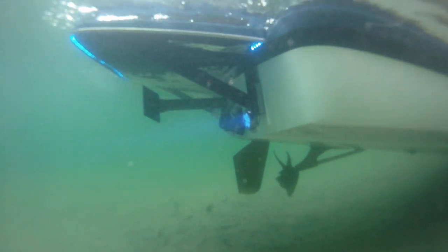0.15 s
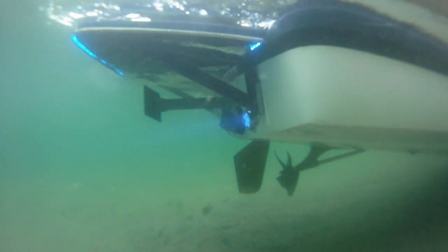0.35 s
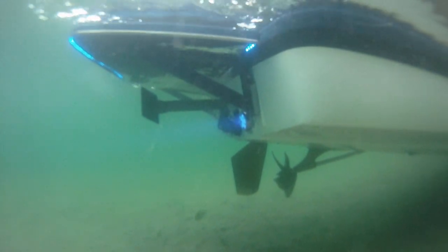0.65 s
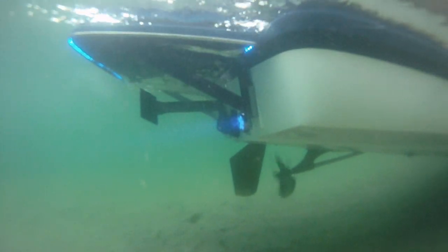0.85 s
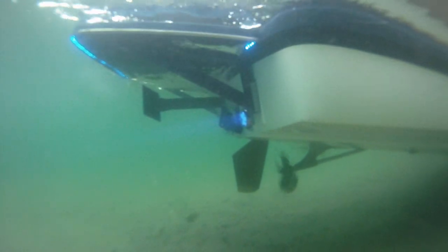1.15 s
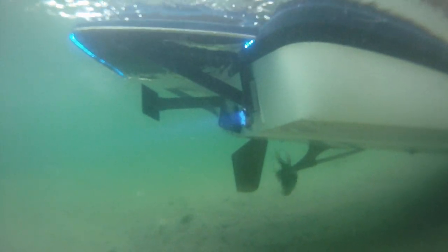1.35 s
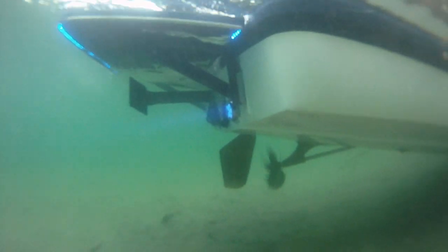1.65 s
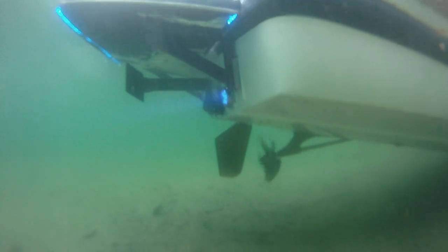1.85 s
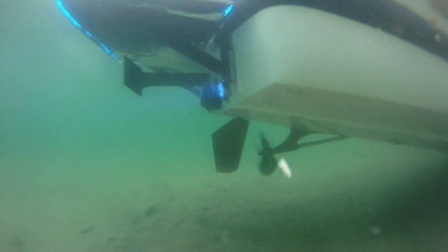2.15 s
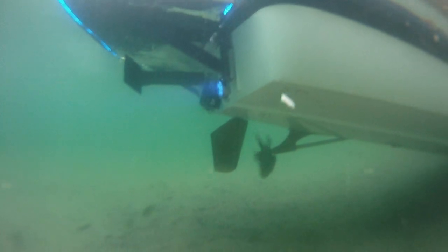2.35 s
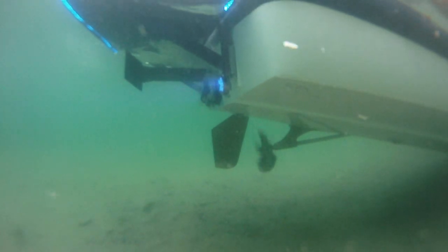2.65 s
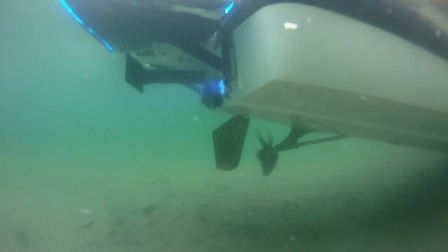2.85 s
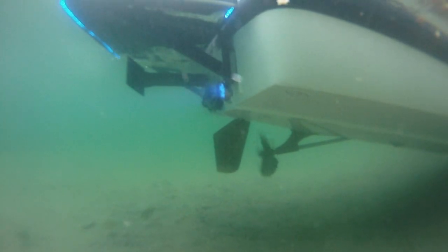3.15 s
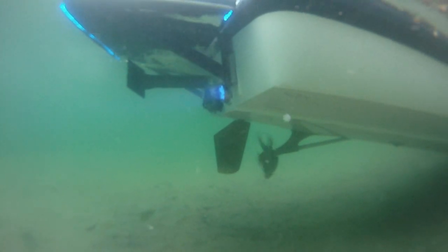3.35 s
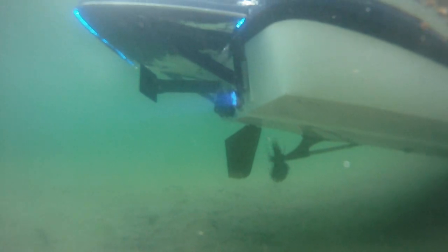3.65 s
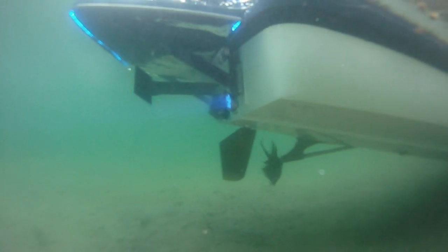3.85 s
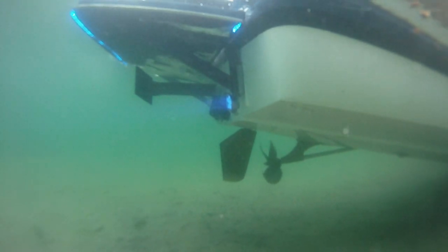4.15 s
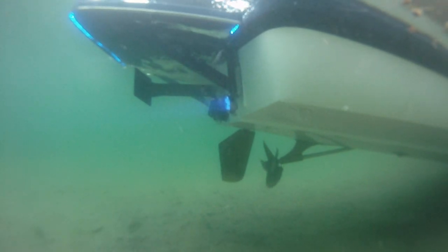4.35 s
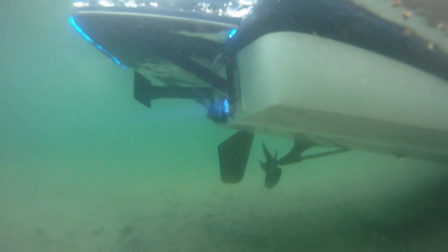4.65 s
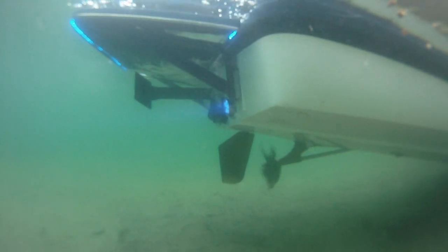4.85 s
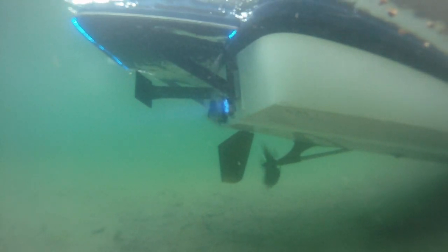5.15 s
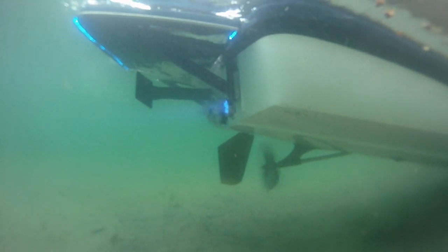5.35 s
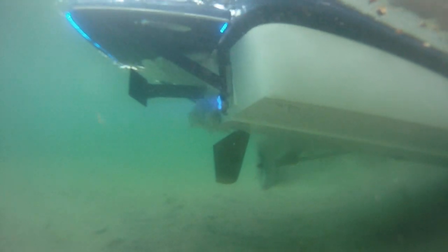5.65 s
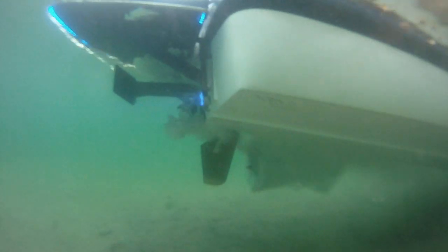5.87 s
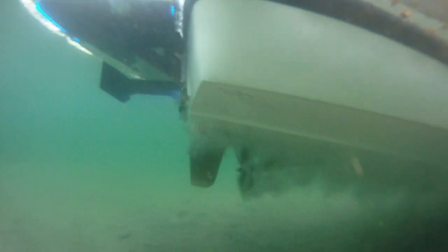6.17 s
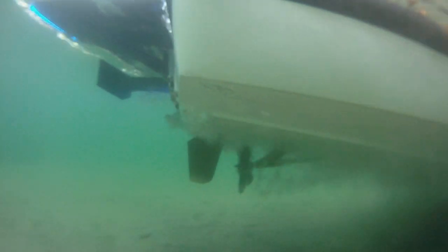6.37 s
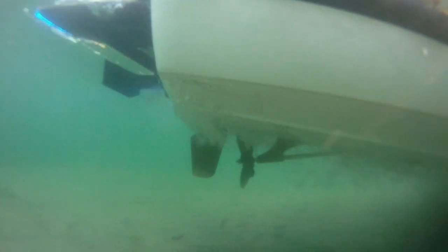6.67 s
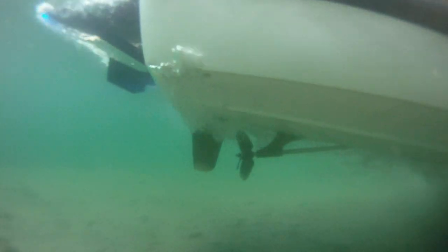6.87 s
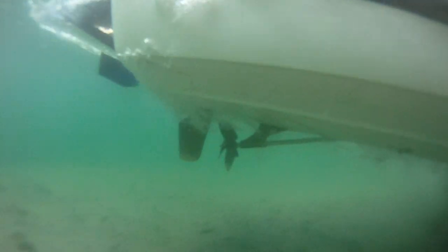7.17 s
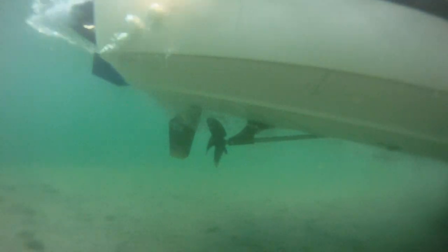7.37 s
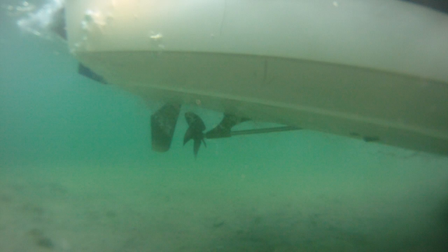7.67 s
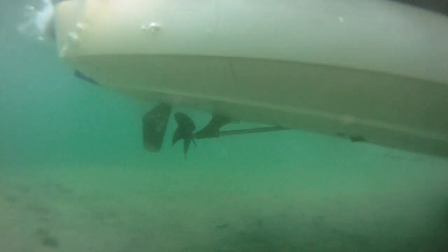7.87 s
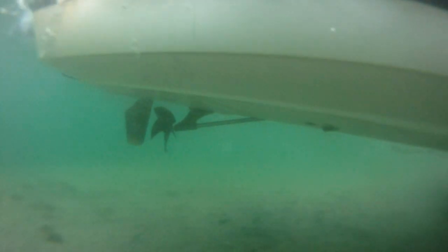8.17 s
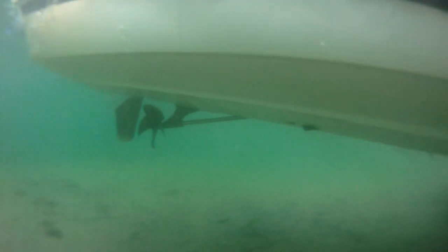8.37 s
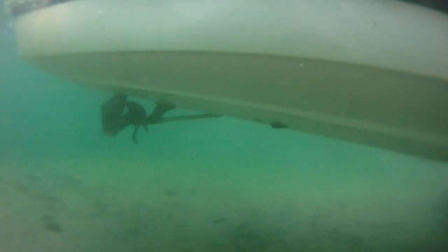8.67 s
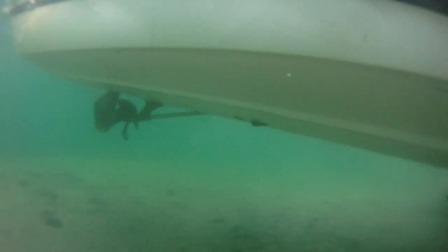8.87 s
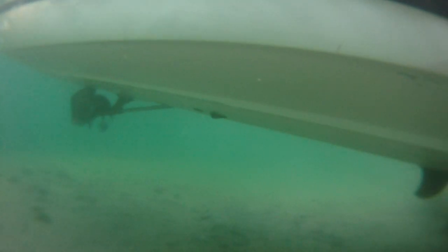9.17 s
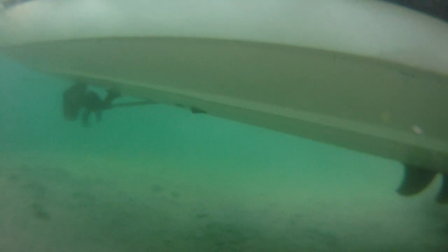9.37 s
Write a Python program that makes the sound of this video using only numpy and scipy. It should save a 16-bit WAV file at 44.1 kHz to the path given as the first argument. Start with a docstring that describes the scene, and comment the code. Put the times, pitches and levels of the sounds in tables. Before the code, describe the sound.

Heard underwater just behind an inboard boat: a soft idle throb and taps on the camera housing, then a rising clutch squeal snaps into a rough, fluttering gear whine for about three seconds. After a pause it engages again, the engine revs, and the propeller churns a burst of bubbles. The revs fall to a low coasting rumble with small plops, and a last short whine ends it. Narrow, glassy camera sound.

```python
"""Idling V8 ski boat, heard under water just astern.

The exhaust throbs as summed firing harmonics over gurgling noise. Three times the clutch squeals upward and
the gears whine and chatter, a mesh tone bent by shaft load. In the second engagement the throttle is blipped,
the propeller churns (coloured bubble impulses), then the boat coasts until the third. Taps ring the waterproof
housing of a cheap camera, whose slow sample-and-hold mirrors the sound into a glassy treble."""
import sys
import numpy as np
from scipy import signal
from scipy.fft import rfft, irfft
from scipy.io import wavfile
from scipy.ndimage import uniform_filter1d

SR = 44100
rng = np.random.default_rng(int(sys.argv[2]) if len(sys.argv) > 2 else 0)


def dump(signal):
    """Clip the signal to [-1, 1] and save it as 16-bit WAV at the path in sys.argv[1]."""
    limited = np.clip(np.atleast_2d(signal).T, -1, 1)
    pcm = np.round(limited * 32767).astype(np.int16)
    wavfile.write(sys.argv[1], SR, pcm)


N = 419832
T = np.arange(N) / SR

# exhaust lines at idle: order (multiple of the eight-firing cycle), level_db
IDLE_LINES = [(8, -2.5), (9, -30), (11, -0.5), (13, -4.5), (15, -12), (16, 1), (18, -13), (24, -13)]
# exhaust lines while coasting: order, level_db
COAST_LINES = [(8, 1), (11, -15), (13, -8.5), (16, -4.5), (24, -27), (48, -21)]
# housing resonances the rattling teeth ring: freq_hz, level_db
RATTLE_MODES = [(2080, -20), (3450, -31), (4550, -38), (5500, -39)]
# stray hard clacks of the gear teeth: time_s, level_db
TOOTH_CLACKS = [(1.0044, -10), (1.6234, -7), (5.3012, -10), (5.3236, -6.5)]
# sharp taps on the housing: time_s, peak_db, brightness_db_per_octave
HOUSING_TAPS = [(.606, -17, -5.5), (.826, -15.5, -1.5), (4.2745, -25.5, -1), (4.343, -7.5, -2.5),
                (4.885, -18, -1), (5.71, -11, -7), (7.56, -37, -1)]
# ringing modes of the housing: freq_hz, level_db, t60_s
HOUSING_MODES = [(353, -7.5, 0.11), (623.6, 4, 0.11), (1290, 4, 0.054), (1850, -10, 0.22), (2114, 2, 0.11),
                 (2210, 4, 0.032), (2763, -9, 0.15), (3310, -14, 0.14)]
# spectra of small, big and finest bubbles, and of exhaust gas: freq_hz, relative_level_db
RUSH_SPECTRUM = [(1200, -22), (1310, 0), (1430, -0.5), (1570, -20), (1770, -0.5), (1900, -3), (2060, 6),
                 (2350, -7.5), (2650, -11), (3100, -18), (3700, -35), (5500, -61)]
CHURN_SPECTRUM = [(130, 2), (185, -1), (240, -1.5), (320, -0.5), (420, 2), (540, 4.5), (625, 13),
                  (700, -3.5), (820, 2), (990, -15), (1120, -20), (1295, 1), (1430, -7.5), (1560, -23)]
FIZZ_SPECTRUM = [(2500, 2.5), (3200, 6), (3700, 1), (4200, -7.5), (4500, -1), (5100, -7.5), (5500, -1.5),
                 (5850, -7)]
GURGLE_SPECTRUM = [(23, -3), (46, -4.5), (81, 5.5), (116, -2), (162, -8.5)]
# throttle blip, then a small surge while coasting: time_s, firing_rate_above_idle_hz
REV_CURVE = [(5.15, 0), (5.3, 15), (5.45, 72.5), (5.7, 114), (5.86, 108), (6.08, 58), (6.3, 35), (6.7, 14),
             (7.25, 5), (8, 15), (8.75, 5), (9.2, 0.5)]
# exhaust swells as the throttle opens, thins at high revs, booms on the overrun: time_s, level_db
EXHAUST_CURVE = [(0, -32), (5.12, -30.5), (5.22, -24), (5.45, -41), (5.92, -37.5), (6.12, -23.5),
                 (6.28, -31), (7.4, -27.3), (9.52, -32)]
# gear put in: clutch_lock_s, let_out_s, whine_db, bite_db, grab_db, wash_db, slip_s
GEAR_ENGAGEMENTS = [(.872, 3.8, -16.5, -9.5, -32.5, -32, .25), (4.798, 5.84, -15.8, -9, -30.5, -36.5, .14),
                    (9.203, 9.44, -17.7, -14.5, -40, -36.3, .13)]
# cavitation as the propeller bites and at top revs, then spin-down: time_s, churn_db, rush_db, fizz_db
THRUST_CURVE = [(5.16, -44, -39, -55), (5.28, -35.5, -21.5, -40), (5.38, -25.5, -21.3, -38.5),
                (5.5, -25.5, -26, -48), (5.74, -27, -20, -37.5), (5.91, -31, -29.5, -51),
                (6.08, -30.5, -32, -52.5), (6.26, -40.5, -42, -63.5), (6.7, -54, -56, -81)]
# stirred water out of gear: churn_db, rush_db, fizz_db
IDLE_STIR_DB = (-43, -49.5, -64.5)
# in gear, relative to the engagement's wash_db: churn_db, rush_db, fizz_db
GEAR_STIR_DB = (-9.5, -.4, -9.2)
# relative to the engagement's grab_db: churn_db, rush_db, fizz_db
GRAB_STIR_DB = (1.5, 2, -14)
# in each engagement, when a blade pass meets a firing: time_s
BLADE_MEETS_FIRING_S = (2.670, 5.149, 9.338)

IDLE_HZ, BLADE_HZ = 42.2, 30.6  # firings and blade passes a second at idle
DIP_DB, DIP_AFTER_S, DIP_S = -12, 0.068, 0.037  # the rumble dips briefly after each take-up
SQUEAL_HZ, SQUEAL_RISE_HZ_PER_S = 372, 120  # slipping plates
LOCK_HZ, LOCK_S = 608, .019  # snap up to speed
SQUEAL_DB, SQUEAL_SWELL_DB_PER_S, BITE_S = -26, 63, 0.007
GRAB_BEFORE_S, GRAB_S = .018, .018  # rough burst just before the lock
WHINE_HZ, WHINE_SAG_HZ_PER_S = 625.8, 330
WHINE_ATTACK_S, WHINE_RELEASE_S = 0.044, .085
SLIDE_FROM_S, SLIDE_TO_S, SLIDE_HZ_PER_S, SLIDE_DB = 5.16, 5.29, 1900, -6  # as the throttle opens
RIPPLE, SLOW_BEAT, SIDE_BEAT, LOOSENESS = .19, .11, .06, .12  # depths of the load on the teeth
BACKLASH, SKID_HZ = .56, 75.46  # play between the teeth; unloaded, they lose step
STRIKE_LEAD_S = .006  # the teeth strike just before the tone swells
SETTLE_DB, SETTLE_S = (1, 7, 12.5), 2.03  # churn, rush, fizz ease as the water gets moving
SPIN_UP_S, SPIN_DOWN_S = 0.16, .11
PREROLL_DB = -8  # the slipping clutch already drags the propeller round
LEAVES_S, LEAVE_DB_PER_S = 6.92, (2.5, 2.16, 2.5)  # idle churn, rush, fizz fade as the stern draws away
CAMERA_RATE_HZ, TOP_HZ = 12000, 15400


def undb(db):
    """Decibels to gain."""
    return 10 ** (np.asarray(db) / 20)


def unit(x):
    """Scale to rms 1."""
    return x / np.sqrt(np.mean(x ** 2) + 1e-18)


def curves(table, outside=None):
    """Columns of a table, joined by straight lines in time."""
    s, *columns = np.transpose(table)
    return [np.interp(T, s, c, outside, outside) for c in columns]


def during(start, end, fade):
    """1 between two times, fading to 0 outside them."""
    return np.clip(1 + np.minimum(T - start, end - T) / fade, 0, 1)


def bump(s, width):
    """Bell-shaped swell around one moment."""
    return np.exp(-.5 * np.minimum(((T - s) / width) ** 2, 100))


def held(start, end, attack, release):
    """Rises from start, holds, and dies away after end."""
    rise = 1 - np.exp(-np.maximum(T - start, 0) / attack)
    return rise * np.exp(-np.maximum(T - end, 0) / release)


def walk(rate):
    """Slow random drift of rms 1."""
    points = rng.standard_normal(4096)
    drift = np.interp(T * rate, np.arange(len(points)), points)
    return unit(uniform_filter1d(drift, max(int(SR / rate / 2), 1)))


def turns(hz):
    """Phase in radians of something that turns at hz."""
    return 2 * np.pi * np.cumsum(hz) / SR


def colour(x, points):
    """Filter by a spectrum that falls 60 dB per octave beyond its ends."""
    octave = np.log2(np.maximum(np.arange(N // 2 + 1) * SR / N, 1))
    hz, db = np.transpose(points)
    edge = np.log2(np.sort(hz))
    outside = np.maximum(edge[0] - octave, 0) + np.maximum(octave - edge[-1], 0)
    return irfft(rfft(x) * undb(np.interp(octave, edge, db) - 60 * outside), N)


def ring(x, hz, width_hz):
    """One resonance, gain 1 at its centre."""
    return signal.lfilter(*signal.iirpeak(hz, hz / width_hz, fs=SR), x)


def band_unit(x, lo, hi):
    """Scale so that the band lo-hi has rms 1."""
    band = signal.butter(4, [lo, hi], "band", fs=SR, output="sos")
    return x / np.std(signal.sosfilt(band, x))


def bubbles(rate, spread_db):
    """Dense tiny collapses of very unequal size."""
    size = undb(spread_db * np.minimum(rng.exponential(size=N), 5))
    collapses = rng.random(N) < rate / SR
    return unit(collapses * size * rng.choice([-1, 1], N))


def taps():
    """Each tap is a short crack and the ring of the housing, whose heavy low modes answer late."""
    out, t = np.zeros(N + SR), np.arange(SR // 4) / SR
    for s, peak_db, bright_db in HOUSING_TAPS:
        modes = 0
        for hz, mode_db, t60 in HOUSING_MODES:
            level = undb(mode_db + bright_db * np.log2(hz / 1000) - 60 * t / t60)
            answer = 1 - np.exp(-t * hz / 2)
            modes = modes + level * answer * np.sin(2 * np.pi * (hz * t + rng.random()))
        crack = ring(ring(rng.standard_normal(len(t)), 1980, 760), 1570, 1640) * np.exp(-t / 0.0041)
        hit = (modes + undb(19.5) * crack) * (1 - np.exp(-t / 0.00049))
        out[int(s * SR):][:len(t)] += undb(peak_db) * hit / np.abs(hit).max()
    return out[:N]


def plops(count=36):
    """Stray exhaust bubbles pinch off in the wake, each a tick and a short rising ping."""
    out, t = np.zeros(N), np.arange(SR // 20) / SR
    for when, size, loud in rng.random((count, 3)):  # a higher size draw is a smaller bubble
        hz = 1200 * 2 ** (1.724 * size)
        ping = np.sin(2 * np.pi * hz * t * (1 + 4 * t)) * np.exp(-t * hz / 6)
        tick = ring(rng.standard_normal(len(t)), 2700, 3310) * np.exp(-t / 0.00078)
        gain = undb(-32.5 - 8 * loud - 6 * size)
        out[int((6.35 + 1.4 * when) * SR):][:len(t)] += gain * (ping + tick / 2)
    return out


def run_down(firing):
    """Higher engine harmonics slide down through the hull as the revs fall."""
    db, = curves([(5.7, -45), (6.1, -49), (6.45, -42), (6.9, -48), (7.48, -47.5), (7.7, -70)])
    harmonics = [(4, -7), (6, 0), (9, -5)]  # multiple of firing rate, dB
    tone = sum(undb(d + 4 * walk(16)) * np.sin(k * firing) for k, d in harmonics)
    return during(5.7, 7.7, .1) * undb(db) * tone


def alternator(hz):
    """A thin, blurred whistle falls and fades as the engine spins down."""
    db, = curves([(5.905, -70), (5.945, -39), (5.995, -50), (6.065, -41), (6.125, -73)])
    whistle = np.sin(turns(33.15 * hz + 65 * walk(300)))
    return whistle * undb(db) * during(5.9, 6.12, .012)


def rumble_level():
    """Exhaust level in dB, with a brief dip after each take-up."""
    db, = curves(EXHAUST_CURVE)
    return db + DIP_DB * sum(bump(lock + DIP_AFTER_S, DIP_S) for lock, *_ in GEAR_ENGAGEMENTS)


def exhaust_lines(firing, orders):
    """Wavering harmonics of the eight-firing cycle, at random phases."""
    total = 0
    for order, db in orders:
        line = np.sin(round(order) * firing / 8 + 2 * np.pi * rng.random())
        total = total + undb(db + 2.35 * walk(4.6)) * line
    return unit(total)


def exhaust(firing, db):
    """Uneven banks throb at idle; coasting, the firing note stands out. Gas gurgles under both."""
    coast = during(6.8, 9.25, 0.51)
    blip = during(5.3, 6.35, 0.1498)
    idle_tone = exhaust_lines(firing, IDLE_LINES) * (1 - np.maximum(coast, blip))
    coast_tone = exhaust_lines(firing, COAST_LINES) * np.maximum(coast, 0.67 * blip)
    gurgle = unit(colour(rng.standard_normal(N), GURGLE_SPECTRUM)) * undb(-6.0 + 9.8 * blip)
    return (idle_tone + coast_tone + gurgle) * undb(db - 0.5)


def wash_levels():
    """Churn, rush and fizz in dB: idle stirring, propeller in gear, grab and throttle add in power."""
    away = np.maximum(T - LEAVES_S, 0)
    thrusts = curves(THRUST_CURVE, -np.inf)
    kinds = zip(IDLE_STIR_DB, LEAVE_DB_PER_S, GEAR_STIR_DB, GRAB_STIR_DB, SETTLE_DB, thrusts)
    levels = []
    for idle, leave, gear, grab, settle, thrust in kinds:
        power = undb(idle - leave * away) ** 2 + undb(thrust) ** 2
        for lock, out, _, _, grab_db, wash_db, slip in GEAR_ENGAGEMENTS:
            preroll = undb(PREROLL_DB) * held(lock - slip, lock, SPIN_UP_S, SPIN_DOWN_S)
            spin = held(lock, out, SPIN_UP_S, SPIN_DOWN_S) + preroll
            settled = settle * np.clip((T - lock) / SETTLE_S, 0, 1)
            power = power + (spin * undb(wash_db + gear - settled)) ** 2
            power = power + (bump(lock - GRAB_BEFORE_S, GRAB_S) * undb(grab_db + grab)) ** 2
        levels.append(10 * np.log10(power))
    return levels


def wash(beat, churn_db, rush_db, fizz_db):
    """Big bubbles churn; small ones rush, collapsing in time with the shaft beat; the finest fizz."""
    churn_bubbles = bubbles(2200, 2.2) * undb(1.7 * walk(30))
    churn = band_unit(colour(churn_bubbles, CHURN_SPECTRUM), 150, 330)
    drive = np.clip((rush_db + 59.5) / 16, .25, 1)  # a coasting propeller hardly pulses
    pulse = unit(undb(drive * (1.65 * beat + 1.8 * walk(45))))
    rush = band_unit(colour(bubbles(3200, 2.8) * pulse, RUSH_SPECTRUM), 1700, 2600)
    fizz = band_unit(colour(bubbles(4800, 2.6) * pulse, FIZZ_SPECTRUM), 3400, 5700)
    return churn * undb(churn_db - 1.64) + rush * undb(rush_db - 0.1) + fizz * undb(fizz_db)


def clutch():
    """Slipping plates squeal upward as the shaft speeds up and bite as they lock; ragged overtones."""
    out = np.zeros(N)
    for lock, _, _, bite_db, *_, slip in GEAR_ENGAGEMENTS:
        left = np.clip(lock - T, 0, slip)  # seconds until lock
        slipping = SQUEAL_HZ - SQUEAL_RISE_HZ_PER_S * left
        hz = slipping + (LOCK_HZ - slipping) * np.exp(-left / LOCK_S)
        phase = turns(hz * (1 + 0.028 * walk(95)))
        ragged = walk(400)
        overtones = undb(-14) * np.sin(2 * phase + ragged) + undb(-20) * np.sin(4 * phase + 2 * ragged)
        tone = np.sin(phase) + overtones
        squeal_db = SQUEAL_DB - SQUEAL_SWELL_DB_PER_S * left + 2.2 * walk(50)
        squeal = tone * undb(squeal_db) * during(lock - slip, lock, 0.028)
        bite = np.sin(phase) * undb(bite_db) * bump(lock, BITE_S)
        out += np.sqrt(2) * (squeal + bite)
    return out


def shaft(firing):
    """Firing and blade phases, counted from a moment in each engagement when the two coincide."""
    phase = firing
    for (lock, *_, slip), meet in zip(GEAR_ENGAGEMENTS, BLADE_MEETS_FIRING_S):
        phase = np.where(T > lock - slip, firing - np.interp(meet, T, firing), phase)
    return phase, phase * BLADE_HZ / IDLE_HZ


def whine():
    """Mesh pitch and strength: steady in gear, sliding up with the throttle, sagging when let out."""
    hz, gain = np.full(N, float(WHINE_HZ)), 0
    for lock, out, whine_db, *_ in GEAR_ENGAGEMENTS:
        sag = WHINE_SAG_HZ_PER_S * np.clip(T - out, 0, 2 * WHINE_RELEASE_S)
        hz = np.where(T > lock, WHINE_HZ - sag, hz)
        gain = gain + undb(whine_db) * held(lock, out, WHINE_ATTACK_S, WHINE_RELEASE_S)
    slide = during(SLIDE_FROM_S, SLIDE_TO_S, 0.00616)
    return hz + slide * SLIDE_HZ_PER_S * (T - SLIDE_FROM_S), gain * undb(SLIDE_DB * slide)


def gears(firing, blades):
    """The mesh tone swells and bends as firings and blades load the teeth, hardest when they coincide."""
    hz, gain = whine()
    beat = np.cos(firing) + np.cos(blades)
    load = RIPPLE * beat + SLOW_BEAT * np.cos(firing - blades) + SIDE_BEAT * np.cos(2 * firing - blades)
    contact = unit(np.maximum(np.exp(load + LOOSENESS * walk(68)) - BACKLASH, .05))
    skid = SKID_HZ * np.exp(-2 * contact) * walk(70)
    mesh = turns(hz + 10 * walk(110) + 3 * beat + skid)
    force = gain * contact
    for s, clack_db in TOOTH_CLACKS:  # the teeth run free around each clack
        force = force * (1 - bump(s, 0.0084)) + undb(clack_db) * bump(s, 0.0038)
    # slack teeth strike roughly, which wakes the neighbouring resonances
    strike = np.interp(T + STRIKE_LEAD_S, T, force)
    chatter = strike * (np.sin(2 * mesh + 1.02 * walk(225)) + 4.96 * rng.standard_normal(N))
    upper = ring(ring(chatter, 1341, 91), 1333, 112)
    lower = ring(ring(chatter, 400, 58), 400, 58)
    rattle = sum(undb(db) * ring(ring(chatter, f, 280), f, 280) for f, db in RATTLE_MODES)
    return undb(2) * force * np.sin(mesh) + rattle + undb(-7.5) * upper + undb(-11.5) * lower


def scene():
    """Engine, propeller and gearbox, heard through the water."""
    hz = IDLE_HZ + curves(REV_CURVE, 0)[0]
    uneven = turns(hz * (1 + 0.00693 * walk(6.5)))
    firing, blades = shaft(turns(hz))
    beat = np.cos(firing) + np.cos(blades)  # torque ripple on the shaft
    engine = exhaust(uneven, rumble_level()) + alternator(hz) + run_down(uneven)
    water = wash(beat, *wash_levels()) + plops()
    drive = gears(firing, blades) + clutch()
    return (taps() + engine + water + drive)[None]


def record(dry):
    """The camera samples slowly and holds each value, which mirrors the sound into a glassy treble."""
    lowpass = signal.ellip(8, .2, 60, 5750, fs=SR, output="sos")
    soft = signal.sosfilt(lowpass, np.clip(dry, -.85, .85))
    slow = signal.resample_poly(soft, CAMERA_RATE_HZ, SR, axis=-1, window=("kaiser", 3))
    stepped = np.repeat(slow, 4, axis=-1)
    out = signal.resample_poly(stepped, SR, 4 * CAMERA_RATE_HZ, axis=-1)[:, :N]
    return signal.sosfilt(signal.ellip(10, .2, 70, TOP_HZ, fs=SR, output="sos"), out)


dry = scene()
out = record(dry)
dump(out)
```